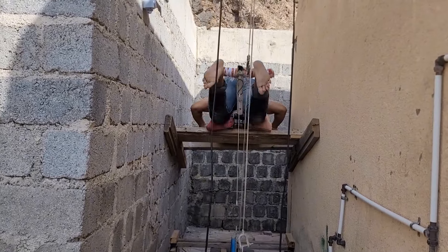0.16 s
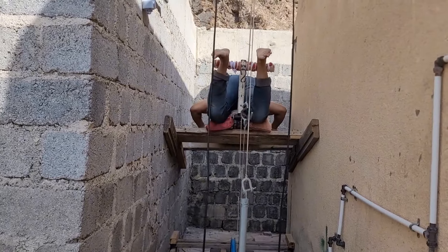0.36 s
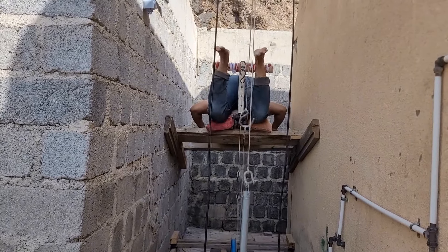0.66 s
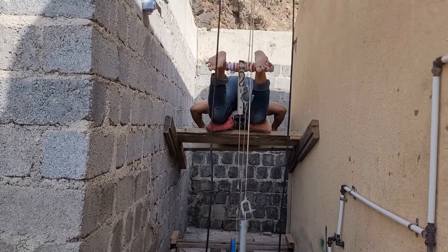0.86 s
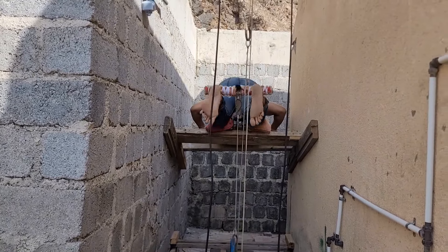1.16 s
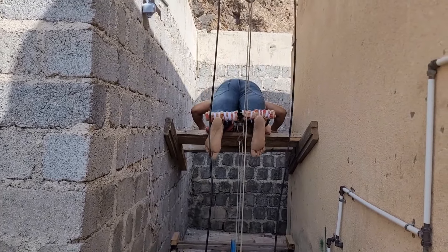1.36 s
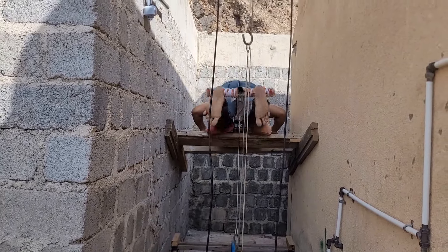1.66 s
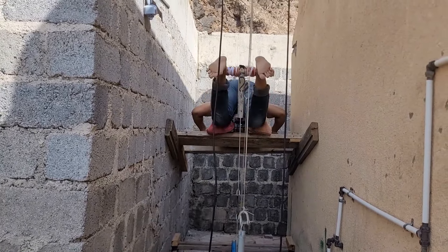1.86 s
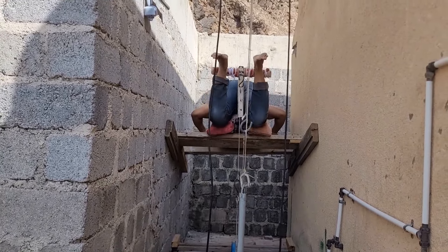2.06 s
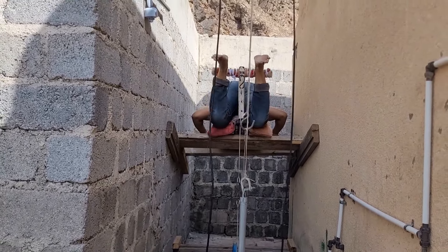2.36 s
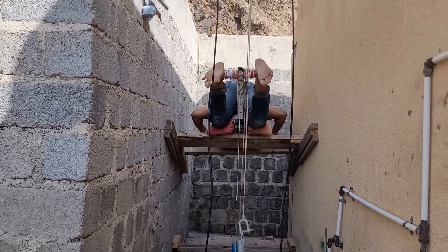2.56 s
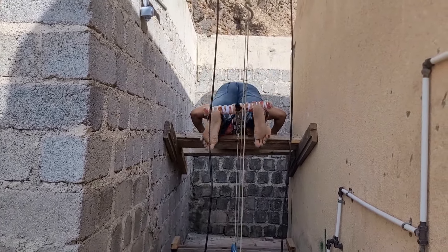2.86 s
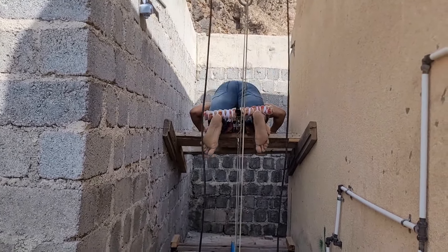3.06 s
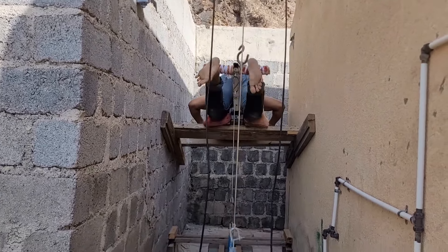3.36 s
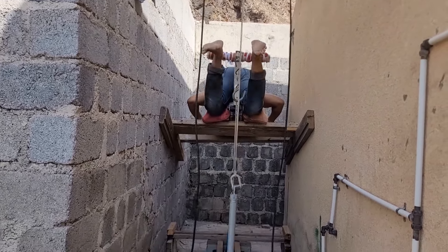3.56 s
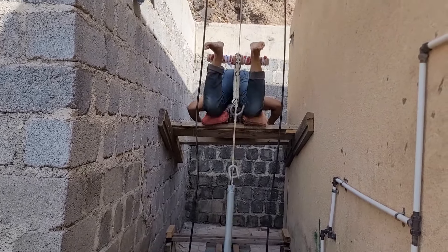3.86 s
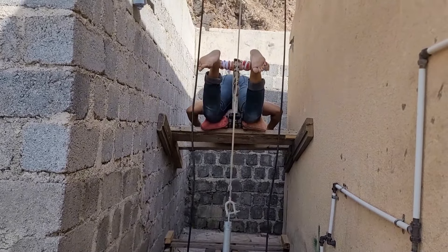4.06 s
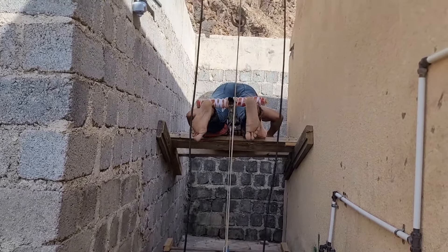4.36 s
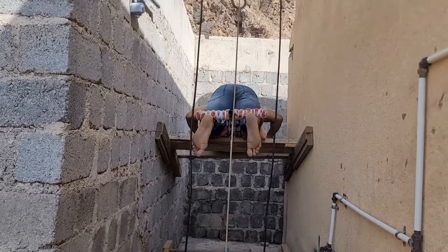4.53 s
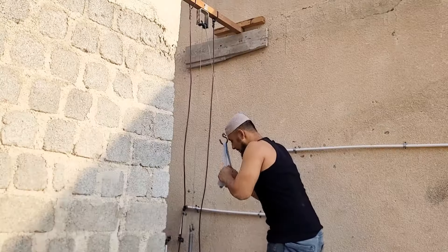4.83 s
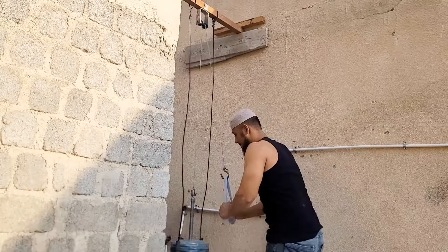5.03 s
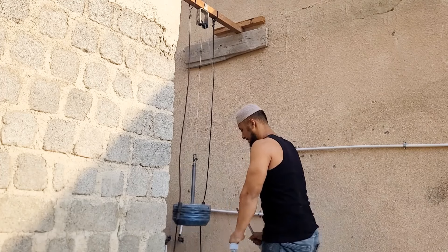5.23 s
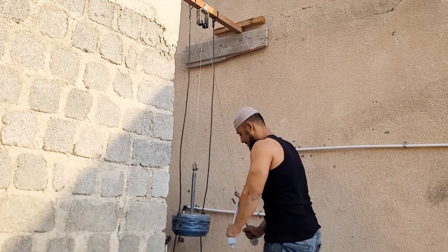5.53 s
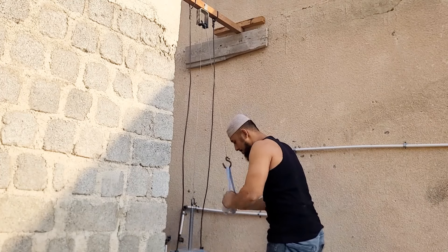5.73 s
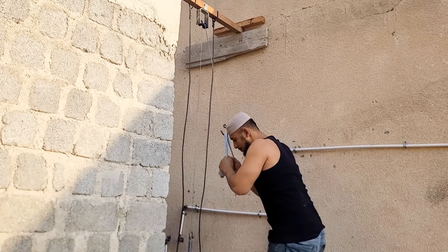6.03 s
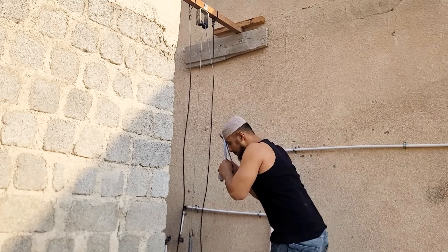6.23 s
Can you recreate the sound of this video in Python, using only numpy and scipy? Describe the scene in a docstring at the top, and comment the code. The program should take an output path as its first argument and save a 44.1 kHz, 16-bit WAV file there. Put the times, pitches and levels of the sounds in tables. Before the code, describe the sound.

Gritty pulley rolling swells and fades stroke by stroke, with tiny squeaks, ringing metal clinks and buffeting wind, then closer rolling with small knocks.

```python
"""Cable over pulleys in a walled yard

A cable runs to and fro over the pulleys of a home-built weight machine, heard from above, then after a cut
from the side. Rolling grit is noise shaking the frame's resonances; the axle squeaks in short sine tones.
A steel hook clinks with decaying modes and noise cracks, and the cable ticks with short noise bursts.
Filtered noise blows as wind on the two microphone ports, with short low pulses as thumps; quiet air and
a low hum lie behind.
"""
import sys
import numpy as np
from scipy import signal
from scipy.fft import rfft, irfft
from scipy.io import wavfile
from scipy.ndimage import uniform_filter1d

SR = 44100
rng = np.random.default_rng(int(sys.argv[2]) if len(sys.argv) > 2 else 0)


def persist_wave(psi):
    """Save psi, clipped to +-1, as 16-bit WAV."""
    counts = np.round(np.clip(psi, -1, 1) * 32767).astype(np.int16)
    wavfile.write(sys.argv[1], SR, np.atleast_2d(counts).T)


N = 281799
T = np.arange(N) / SR
HZ = np.fft.rfftfreq(N, 1 / SR) + 1e-3  # kept off zero for logs and divisions


def undb(db):
    """Decibels to gain."""
    return 10 ** (np.asarray(db) / 20)


def unit(x):
    """Scale to rms 1."""
    return x / np.sqrt(np.mean(x ** 2))


def decay(t, t60):
    """Exponential fade that falls 60 dB in t60 seconds."""
    return 1000. ** (-t / t60)


def across(table):
    """Points joined on a log-frequency axis."""
    hz, value = np.array(table).T
    return np.interp(np.log(HZ), np.log(hz), value)


def band(x, hz, width_hz):
    """Two-pole resonance, gain 1 at the centre."""
    return signal.lfilter(*signal.iirpeak(hz, hz / width_hz, fs=SR), x)


def walk(rate):
    """Random levels held 1 / rate s and slewed twice; spread near 1."""
    hold = int(SR / rate)
    steps = np.repeat(rng.standard_normal(N // hold + 1), hold)
    return 1.3 * uniform_filter1d(uniform_filter1d(steps, hold), hold)[:N]


def pair(alike):
    """Spectra of left and right noise whose likeness depends on frequency."""
    c = np.clip(alike, 0, 1)
    mid, side = rfft(rng.standard_normal((2, N)))
    return np.sqrt(1 + c) * mid + np.sqrt(1 - c) * side * np.array([[1], [-1]])


def sides(pan_db):
    """Left and right gain from their difference in dB."""
    return undb(np.array([pan_db, -pan_db]) / 2)


def stroke(start, at_speed, slows, stop, jolt):
    """Cable speed 0-1: a jolt as it breaks free, a quarter sine up, a hold, a quarter sine down."""
    ramp = np.interp(T, [start, at_speed, slows, stop], [jolt, 1, 1, 0], left=0)
    return np.sin(np.pi / 2 * ramp)


# cable strokes: (starts [s], at speed [s], slows [s], stops [s], mid roll level [dB], hiss level [dB],
# then rumble relative to mid roll at each of the four times [dB]);
# the last stroke is still at speed when the sound ends; its last two times are not reached
CABLE_STROKES_ABOVE = [(-.5, -.1, 0.12, 0.53, -37.5, -48.5, -14, -5, -3.5, 1.5),
                       (.56, .84, 1.28, 1.423, -46.5, -58, 11.5, -2.5, 6, 3.5),
                       (1.35, 1.62, 1.794, 2.223, -38, -50.5, 1.5, -1, -3.5, 14),
                       (2.17, 2.5, 2.878, 3.024, -37.5, -49, -8.5, 0, 3, 3.5),
                       (2.9, 3.16, 3.386, 3.802, -36, -47.5, -5, 2.5, -1.5, 6.9),
                       (3.72, 4.1, 4.325, 4.57, -40.5, -49.5, -4, 1, 0.5, 4.7)]
CABLE_STROKES_SIDE = [(4.46, 4.5, 4.5, 4.73, -47.5, -77, 14, 12, 14, -5),
                      (4.677, 4.85, 5.018, 5.402, -37.5, -52.5, 10.7, -1.5, -7, -6.5),
                      (5.343, 5.5, 5.686, 6.148, -38, -53.5, 2.6, -6, -1, 11.5),
                      (6.097, 6.28, 7.25, 6.94, -38, -51, 10.7, -0.5, -17, -13)]
# frame resonances: (frequency [Hz], width [Hz], level [dB])
FRAME_MODES_ABOVE = [(251, 20, -8.5), (306.2, 15, 2.5), (359.7, 15.6, 6), (402.3, 7, 4.5), (542, 72, -9),
                     (710, 22.6, -2), (765, 18, -5), (875, 58, -11), (1198, 14, -9), (1431, 30, -7),
                     (1475, 13, -12), (1848, 56, -14), (2594, 150, -19.5)]
FRAME_MODES_SIDE = [(247, 15, -37), (311, 15.3, 7.5), (349, 12.5, 2.5), (403, 3.7, 0.5), (690, 16, -2.5),
                    (800, 34, -10), (920.3, 21, -0.5), (1231, 22, -8.5), (1398, 21, -5), (1903, 26, -3),
                    (3340, 94, -23.5), (4130, 240, -28), (4710, 68, -21), (5000, 26, -26), (7380, 240, -29),
                    (11600, 140, -34), (12870, 230, -26.5)]
# broad roll between the resonances: (frequency [Hz], spectral level [dB])
BROAD_ROLL_ABOVE = [(150, -50), (230, -5), (450, -18.5), (900, -19.5), (1600, -19), (2700, -24.5),
                    (3200, -34.5), (5500, -38), (9000, -44.5), (13500, -38), (16000, -44.5)]
BROAD_ROLL_SIDE = [(190, -34), (260, -6), (600, -17.5), (1000, -17.5), (2100, -19.5), (2700, -28.5),
                   (5100, -27), (5500, -35), (9000, -37.5), (13000, -33.5), (16000, -41)]
# likeness of left and right: (frequency [Hz], correlation [0-1, values below 0 play as 0])
LIKENESS_ABOVE = [(60, 0), (130, 0.22), (290, 0.95), (640, 0.54), (1410, 0), (3100, 0), (6820, 0),
                  (15000, 0)]
LIKENESS_SIDE = [(60, 0.89), (130, 0.63), (290, 0.86), (640, 0.081), (1410, 0.25), (3100, -0.05),
                 (6820, -1.3), (15000, -0.2)]
WANDER, WANDER_PER_S, PATCHY_DB = .009, 7.5, 2.2  # relative pitch drift, its rate, uneven shaking


def pulleys(strokes, frame, roll, alike, bump_db, waver_db, blur, range_db, lag_share, jolt, grit_db):
    """Grit under the cable shakes the frame; each resonance is caught unevenly and reaches the right port first."""
    # rumble, mid roll and hiss each rise by their own range as the cable gains speed
    gains = 0
    for row in strokes:
        when, (mid_db, hiss_db) = row[:4], row[4:6]
        rumble_db = np.interp(T, when, row[6:])
        full_db = np.broadcast_arrays(mid_db + rumble_db, mid_db, hiss_db)
        slack = 1 - stroke(*when, jolt)
        gains = gains + undb(full_db - np.array(range_db)[:, None] * slack)
    bumps = undb(bump_db * walk(90) + 1.02 * walk(25.313))
    likeness = across(alike)
    rings = 0
    for hz, width_hz, db in frame:
        shaking = undb(waver_db * walk(22.064) + PATCHY_DB * walk(8.5))
        shaken = band(rng.standard_normal((3, N)) * shaking, hz, width_hz)
        # the pitch wanders as the load on the frame shifts
        warped = T + WANDER * np.cumsum(walk(WANDER_PER_S)) / SR
        common, left, right = (np.interp(warped, T, x) for x in shaken)
        # the less alike the ports are here, the larger the phase lag on the left
        turn = np.arccos(np.clip(np.interp(hz, HZ, likeness), 0, 1)) * lag_share
        lag = int(turn * SR / (2 * np.pi * hz))
        rings = rings + undb(db) * np.array([np.roll(common, lag) + blur * left, common + blur * right])
    body = pair(likeness) * undb(across(roll)) + rfft(rings)
    # split at 550 and 3000 Hz into rumble, mid roll and hiss
    low, high = (1 / (1 + (HZ / edge_hz) ** 8) for edge_hz in (550, 3000))
    layers = [unit(irfft(body * part, N)) for part in (low, high - low, 1 - high)]
    lumps = [undb(1.25 * walk(13)), undb(0.53 * walk(6.4)), undb(0.21 * walk(15.0) + grit_db * walk(45))]
    return bumps * sum(x * gain * lump for x, gain, lump in zip(layers, gains, lumps))


# brief axle squeaks: (middle [s], frequency [Hz], level [dB], half length [s])
AXLE_SQUEAKS = [(1.066, 1450, -47, 0.017), (1.141, 1470, -48, 0.0087), (1.197, 1200, -44.5, 0.012),
                (1.219, 1440, -46, 0.0089), (1.327, 1765, -46.5, 0.016), (2.54, 1442, -44.5, 0.11),
                (4.01, 1430, -44.5, 0.017), (4.113, 1443, -42, 0.011)]


def squeaks():
    """The axle catches for a moment and sings a steady tone, its phase a little later on the left."""
    lag = np.array([[.7], [0]])  # radians, left and right
    out = 0
    for s, hz, db, half_s in AXLE_SQUEAKS:
        tone = np.sqrt(2) * np.sin(2 * np.pi * hz * T - lag)
        out = out + undb(db) * tone * np.exp(-((T - s) / half_s) ** 4)
    return out


# short modes of the steel hook: (frequency [Hz], level [dB], t60 before RING_SHORTEN [s])
HOOK_MODES = [(1464, -6, .3), (3700, -5, .07), (3770, -5, .1), (4597, -2, .065), (4720, -9, .05),
              (5275, 1, .09), (5550, -6, .05), (6330, -8, .05), (6800, -6, .04), (7850, 0, .035),
              (9700, -7, .05), (12370, -2, .1), (12450, -6, .14), (13265, -4, .06), (13900, -8, .06)]
# hook clinks: (time [s], crack level before CRACK_TRIM_DB [dB], ring level [dB] near 1.5 kHz, near 3.7 kHz,
# near 4.6 kHz, near 5.3 kHz, at 6-9 kHz and above 9 kHz, longest mode level [dB], swings free [s],
# tail level of the longest mode [dB])
HOOK_CLINKS = [(.54, -93, -75, -72, -68, -70, -85, -99, -79, 0.035, -83),
               (1.141, -22.5, -54, -56, -38.5, -41, -43, -48, -56, 0.11, -67),
               (1.3459, -31, -51, -59, -40, -43, -42.5, -52, -64, 0.062, -68),
               (1.63, -55, -67, -50, -60, -49, -64, -66, -83, .02, -80),
               (1.688, -18, -55, -40, -44, -42, -59, -57, -80, 0.02, -80),
               (2.2329, -26, -43.5, -43, -41, -52, -41, -45.5, -57, 0.017, -62),
               (2.284, -83, -67, -71, -63, -70, -74, -74, -54.5, 0.032, -65),
               (2.501, -19.5, -31, -34, -42, -54, -42, -55, -70, 0.018, -66),
               (2.7865, -40, -48, -57, -41, -57, -46, -57, -56, 0.05, -61),
               (2.948, -22.5, -41, -46.5, -42, -50, -48, -63, -70, 0.029, -62),
               (3.042, -50, -62, -47, -62, -66, -66, -70, -76, .02, -76),
               (3.152, -18, -37, -52, -38, -38, -39, -42, -44, 0.038, -51),
               (3.2368, -27, -30, -48, -36, -54, -48, -61, -52, 0.045, -57),
               (3.3988, -41, -54, -41, -26, -49, -34.5, -34.5, -39, 0.13, -56),
               (3.639, -33, -63, -50, -38.5, -66, -54, -58, -46, 0.013, -55),
               (3.8132, -28, -39, -57, -22.5, -53, -33.5, -33.5, -34, 0.028, -47),
               (4.132, -20, -32, -48, -25, -44, -28.5, -35, -38, 0.081, -50.5),
               (4.362, -27, -38.5, -37, -35, -33.5, -31, -38.5, -45.5, 0.19, -77)]
RING_SHORTEN, CRACK_TRIM_DB = 0.78, -18.0
CLATTER_DB, CLATTER_T60_S = -4, 0.11
# longest mode: swells just after the blow, rings free, then a touch chokes it to a faint tail
RING_HZ, SWELL_AFTER_S, SWELL_S, FREE_T60_S, CHOKE_S = 4414, 0.011, 0.0027, 1.6, 0.0025
TAIL_T60_S, TAIL_WAVER_DB = .9, 5
PARTNER_HZ, PARTNER_DB = 4597, -10  # second tone in the tail, level relative to the tail


def hook():
    """Each blow cracks and rings the short modes; the long mode rings free until the hook touches again."""
    out, t = np.zeros((2, N + SR)), T[:SR // 3]
    age = T[:SR]
    hz, db, t60 = np.array(HOOK_MODES).T[:, :, None]
    family = np.searchsorted([3000, 4000, 5000, 6000, 9000], hz)  # which ring column each mode follows
    long, partner = np.zeros((2, N))
    waver = undb(TAIL_WAVER_DB * np.tanh([walk(37), walk(40)]))
    for s, crack_db, *ring_db, long_db, free_s, tail_db in HOOK_CLINKS:
        # every blow strikes the modes with other strengths, pitches and phases
        size, detune, *phases = rng.standard_normal((4, len(HOOK_MODES), 1))
        fade = undb(db + np.array(ring_db)[family] + size) * decay(t, RING_SHORTEN * t60)
        turn = 2 * np.pi * hz * (1 + .004 * detune) * t
        ring = np.array([(fade * np.sin(turn + phase)).sum(axis=0) for phase in phases])
        crack = band(rng.standard_normal((2, len(t))), 5000, 16000)
        crack *= decay(t, 0.019) + 0.31 * decay(t, 0.043)
        clatter = band(rng.standard_normal((2, len(t))), 4600, 2900) * decay(t, CLATTER_T60_S)
        i = int(s * SR)
        out[:, i:i + len(t)] += ring + undb(crack_db + CRACK_TRIM_DB) * (crack + undb(CLATTER_DB) * clatter)

        span = slice(i, i + SR)
        free = decay(age, FREE_T60_S) * np.exp(-np.maximum(age - free_s, 0) / CHOKE_S)
        tail = waver[:, span] * decay(age, TAIL_T60_S)
        swell = 1 / (1 + np.exp((SWELL_AFTER_S - age) / SWELL_S))
        # the new ring takes over from the last one
        long[span] = (1 - swell) * long[span] + swell * (undb(long_db) * free + undb(tail_db) * tail[0])
        partner[span] = undb(tail_db + PARTNER_DB) * tail[1]
    # the loose hook chatters while it rings
    chatter = undb(3 * np.array([walk(150), walk(150)]))
    partner_tone = partner * np.sin(2 * np.pi * PARTNER_HZ * T + 2 * walk(40))
    clinks = out[:, :N] * chatter + partner_tone
    # the phase drifts, partly by itself at each port
    drift = 0.81 * walk(28) + np.array([[.9], [0]]) + 0.31 * np.array([walk(7.9), walk(6.7)])
    long_level = np.sqrt(2) * long * undb(2.8 * np.tanh(walk(55)))
    return clinks, long_level * np.sin(2 * np.pi * RING_HZ * T + drift)


# cable ticks: (time [s], level before TICK_TRIM_DB [dB])
CABLE_TICKS = [(0.397, -41), (.627, -48), (.732, -43), (0.8071, -50), (1.411, -34.5), (1.479, -26),
               (1.7769, -39), (2.111, -32.5), (2.996, -27.5), (3.0153, -27), (3.498, -34), (3.697, -38),
               (4.501, -25.5), (4.5147, -33)]
TICK_HZ, TICK_T60_S, TICK_TRIM_DB = 11800, 0.042, -13.0
# knocks in the frame at the second spot: (time [s], snap level [dB], ring level [dB], thud level [dB])
FRAME_KNOCKS = [(4.533, -71, -62, -42), (4.548, -71.5, -64, -44), (4.57, -74, -65, -43),
                (4.607, -77, -50.5, -59), (4.636, -76, -67, -69), (4.677, -81, -54, -69),
                (4.717, -69, -64, -56), (4.769, -61, -64, -41), (5.3134, -89, -63, -69),
                (5.3418, -81, -52, -51), (5.413, -54, -46, -44), (5.635, -43, -49, -50),
                (5.84, -63, -50, -41), (5.973, -76, -52.5, -45), (6.098, -60, -45, -55),
                (6.156, -65, -46, -46), (6.194, -46, -45, -53), (6.283, -41, -40, -52)]
# snap, ring and thud of a knock: (frequency [Hz], width [Hz], t60 [s])
KNOCK_PARTS = [(2100, 1800, 0.023), (1350, 250, 0.09), (336, 80, 0.035)]


def ticks():
    """Short bright snaps as the cable takes or sheds load; duller knocks through the frame at the second spot."""
    out, t = np.zeros((2, N + SR)), T[:SR // 8]
    for s, db in CABLE_TICKS:
        snap = unit(band(rng.standard_normal((2, len(t))), TICK_HZ, 0.78 * TICK_HZ))
        i = int(s * SR)
        out[:, i:i + len(t)] += undb(db + TICK_TRIM_DB) * snap * decay(t, TICK_T60_S)
    for s, *part_db in FRAME_KNOCKS:
        i = int(s * SR)
        for db, (hz, width_hz, t60) in zip(part_db, KNOCK_PARTS):
            knock = unit(band(rng.standard_normal(len(t)), hz, width_hz))
            out[:, i:i + len(t)] += undb(db) * knock * decay(t, t60)
    return out[:, :N]


WALLS_DB, WALLS_T60_S = -3.5, 0.13


def walls(x):
    """Close stone walls return a short dense tail, another one to each port."""
    t = T[:SR // 5]
    tail = rng.standard_normal((2, len(t))) * decay(t, WALLS_T60_S) * (t > .003)
    tail /= np.sqrt(np.sum(tail ** 2, axis=1, keepdims=True))
    return x + undb(WALLS_DB) * signal.fftconvolve(x, tail, axes=1)[:, :N]


# wind gusts: (rise aimed at full level by [s], fall counted from [s], level before WIND_TRIM_DB [dB],
# upper buffet relative to that level [dB], left minus right [dB])
WIND_GUSTS = [(0.014, 0.065, -11.5, -6, 10.5), (0.206, 0.27, -16.5, -5.5, 2), (0.29, 0.35, -21, -14.5, 0),
              (0.65, 0.7, -52, -9, -24.5), (.82, 0.91, -40, -28, -3), (1.54, 1.62, -45, -30, -7),
              (2.197, 2.14, -38, -14, 2), (2.816, 3.03, -43, -42, 10), (2.91, 2.95, -44, -30, -8),
              (3.274, 3.32, -38.5, -31, 11), (3.454, 3.54, -46.5, -28, 17), (3.667, 3.69, -45, -22, 26),
              (3.792, 3.8, -42.5, -12.5, 7), (3.947, 4.1, -26, -22, -1), (4.106, 4.134, -25.5, -2, -3),
              (4.195, 4.292, -30.5, -47, 2.5), (4.397, 4.4, -31, -38, 4)]
GUST_RISE_DB_PER_S, GUST_FALL_DB_PER_S = 450, 322
# before WIND_TRIM_DB: steady breeze, its sway, and the rasp
BREEZE_DB, BREEZE_SWAY_DB, RASP_DB, WIND_TRIM_DB = -53, 3.5, -21, -3.5
# wind thumps: (time [s], level before THUMP_TRIM_DB [dB], frequency [Hz], left minus right [dB])
WIND_THUMPS = [(.036, -11, 467, 26), (.039, -12, 800, 15), (0.046, -9, 170, 6), (.053, -6, 199, 16),
               (0.061, -5, 230, 10), (.067, -10, 105, 6), (0.076, -9, 127, 12), (0.209, -22, 580, 4),
               (.212, 2, 258, 3), (0.232, -11, 126, 5), (.241, -2.5, 262, 4), (.318, -15.5, 440, 6),
               (2.194, -29.5, 102, -2), (2.818, -30, 109, 25), (2.971, -25, 87.6, 8), (3.01, -23.5, 95, 2),
               (3.285, -22, 128, 3), (3.801, -23, 106.4, 4), (3.971, -14.5, 154, 3), (3.997, -4, 276, 2),
               (4.05, -18, 200, -10), (4.117, -3, 133, -1)]
THUMP_TRIM_DB = -5.0


def wind():
    """Eddies strike each port on its own: lumpy bass, an upper buffet, a rasp, a few single thumps."""
    bass_gain = undb(BREEZE_DB + BREEZE_SWAY_DB * np.array([walk(8.24), walk(8.33)]))
    upper_gain = 0
    for rise_by, fall_from, db, upper_db, pan_db in WIND_GUSTS:
        rise_db = GUST_RISE_DB_PER_S * np.maximum(rise_by - T, 0)
        fall_db = GUST_FALL_DB_PER_S * np.maximum(T - fall_from, 0)
        gust = undb(db - rise_db - fall_db) * sides(pan_db)[:, None]
        bass_gain = bass_gain + gust
        upper_gain = upper_gain + gust * undb(upper_db)
    lumps = undb(2.5 * np.array([walk(45), walk(45)]))
    eddies = rfft(rng.standard_normal((2, N)) * lumps)
    bass = irfft(eddies / (1 + (42 / HZ) ** 4) / (1 + (HZ / 125) ** 3), N)
    upper = irfft(eddies / (1 + (200 / HZ) ** 3) / (1 + (HZ / 330) ** 3), N)
    rasp = irfft(eddies / (1 + (450 / HZ) ** 3) / (1 + (HZ / 900) ** 3), N)
    # strong gusts rasp most: it grows with the square of the gust
    rasp_gain = bass_gain ** 2 * undb(RASP_DB)
    out = unit(bass) * bass_gain + unit(upper) * upper_gain + unit(rasp) * rasp_gain
    out *= undb(WIND_TRIM_DB)
    skew = rng.uniform(0, 1, (len(WIND_THUMPS), 1)) * [0, 1.2]  # each port meets the thump at another phase
    for (s, db, hz, pan_db), phase in zip(WIND_THUMPS, skew):
        near = slice(max(int(s * SR) - 2000, 0), int(s * SR) + 2000)
        cycles = (T[near] - s) * hz
        shape = np.cos(2 * np.pi * cycles + phase[:, None]) * np.exp(-(cycles / 0.53) ** 2)
        out[:, near] += sides(pan_db)[:, None] * undb(db + THUMP_TRIM_DB) * shape
    return out


# low hum: (time [s], level [dB])
HUM_LEVEL = [(4.55, -46), (5.1, -57), (5.3, -85), (5.6, -53), (6.0, -59), (6.39, -66)]
HUM_HZ, HUM_WIDTH_HZ = 63, 11  # width of each of two resonances in series


def low_hum():
    """Noise through two narrow resonances gives a low wavering hum."""
    once = band(rng.standard_normal(N), HUM_HZ, HUM_WIDTH_HZ)
    return unit(band(once, HUM_HZ, HUM_WIDTH_HZ)) * undb(np.interp(T, *np.transpose(HUM_LEVEL)))


# colour of the yard's air: (frequency [Hz], relative spectral level [dB])
AIR_COLOUR = [(25, -25), (45, 5), (70, -3.5), (110, 2), (180, -28), (300, -22), (1200, -35), (3000, -47),
              (16000, -44)]
AIR_DB = -60


def yard_air():
    """Quiet, mostly low noise, partly alike at both ports."""
    return unit(irfft(pair(0.49) * undb(across(AIR_COLOUR)), N)) * undb(AIR_DB)


CUT_S = 4.53


def scene():
    """Two spots joined by a cut; ticks and air run through both."""
    above = pulleys(CABLE_STROKES_ABOVE, FRAME_MODES_ABOVE, BROAD_ROLL_ABOVE, LIKENESS_ABOVE,
                    bump_db=1.23, waver_db=2.0, blur=0.23, range_db=[36, 42, 38],
                    lag_share=.55, jolt=0, grit_db=0.2)
    side = pulleys(CABLE_STROKES_SIDE, FRAME_MODES_SIDE, BROAD_ROLL_SIDE, LIKENESS_SIDE,
                   bump_db=1.77, waver_db=1.0, blur=0.26, range_db=[44, 50, 52],
                   lag_share=0.19, jolt=0.32, grit_db=2.0)
    clinks, long_ring = hook()
    first_spot = above + squeaks() + walls(clinks) + long_ring + wind()
    second_spot = side + low_hum()
    later = np.clip((T - CUT_S) / .003, 0, 1)  # 3 ms crossfade
    return (1 - later) * first_spot + later * second_spot + walls(ticks()) + yard_air()


TOP_HZ = 15750


def record(dry):
    """The loudest gusts round off; the top is cut."""
    rounded = np.tanh(1.2 * dry) / 1.1
    top_cut = signal.ellip(10, .2, 60, TOP_HZ, fs=SR, output="sos")
    return signal.sosfilt(top_cut, rounded)


dry = scene()
out = record(dry)
persist_wave(out)
```